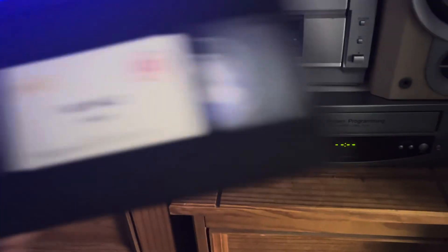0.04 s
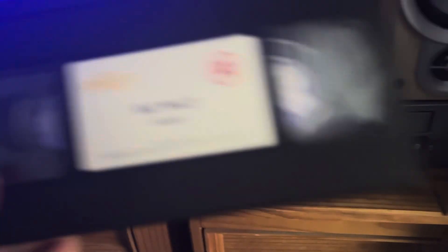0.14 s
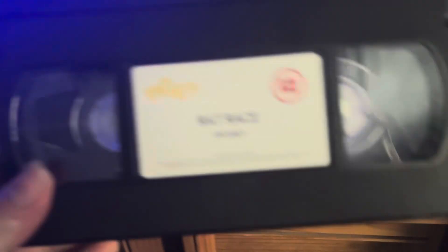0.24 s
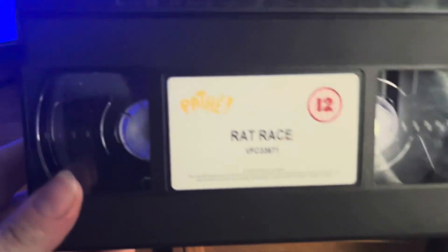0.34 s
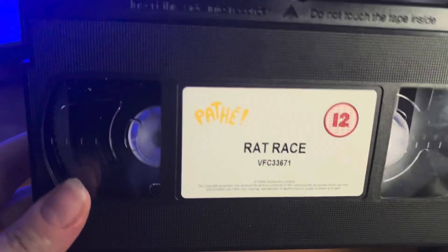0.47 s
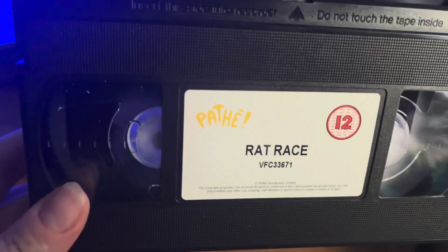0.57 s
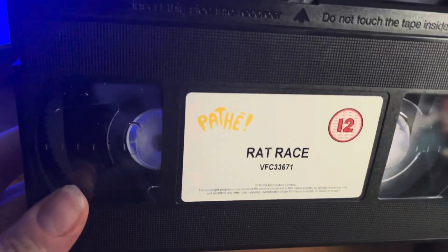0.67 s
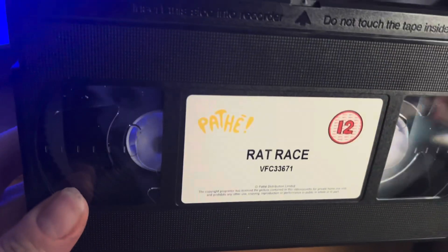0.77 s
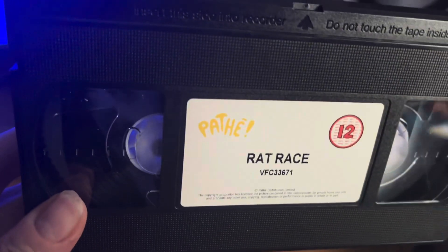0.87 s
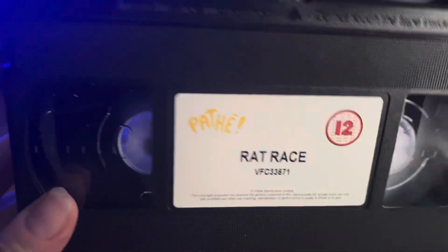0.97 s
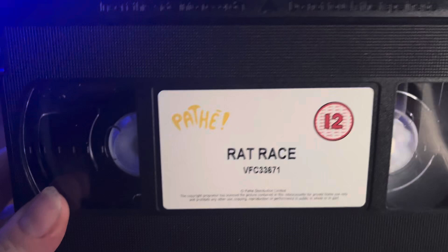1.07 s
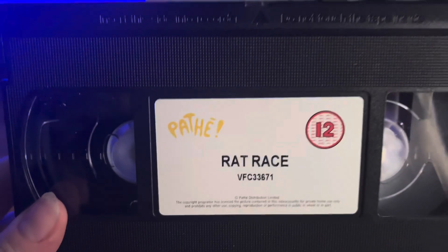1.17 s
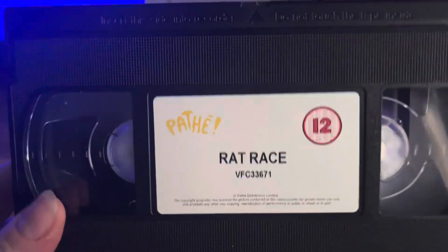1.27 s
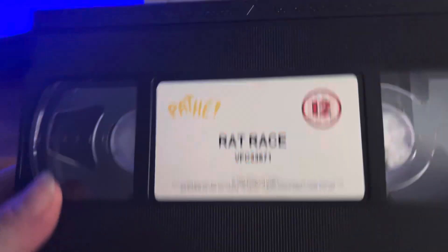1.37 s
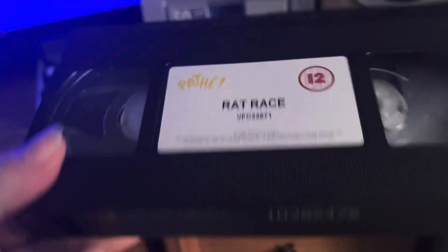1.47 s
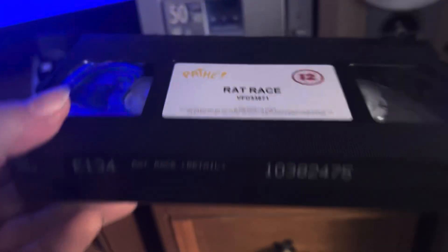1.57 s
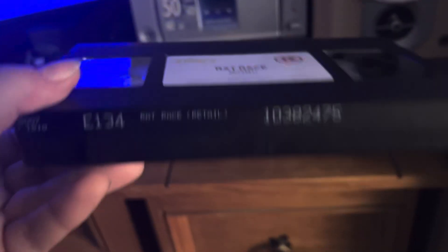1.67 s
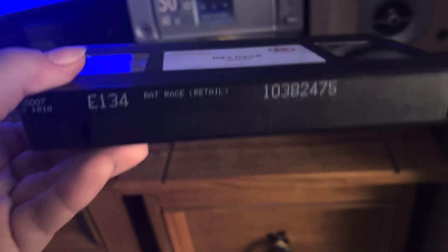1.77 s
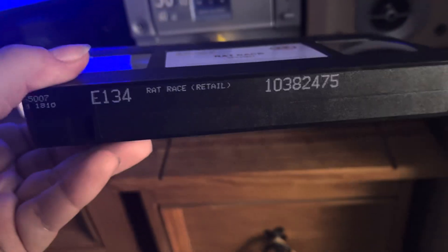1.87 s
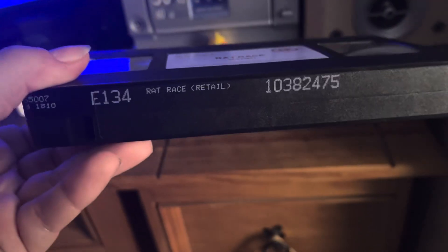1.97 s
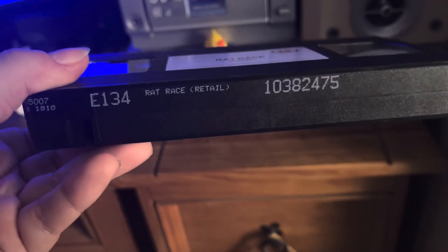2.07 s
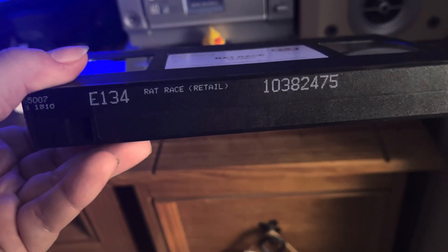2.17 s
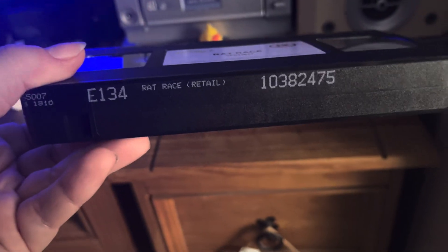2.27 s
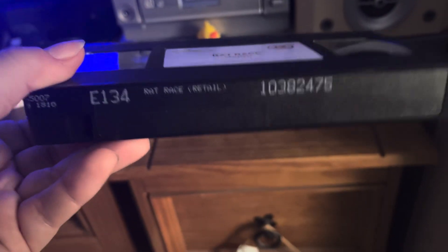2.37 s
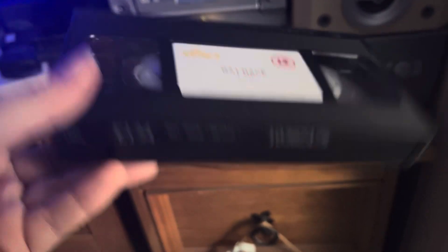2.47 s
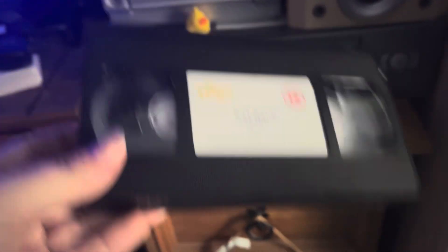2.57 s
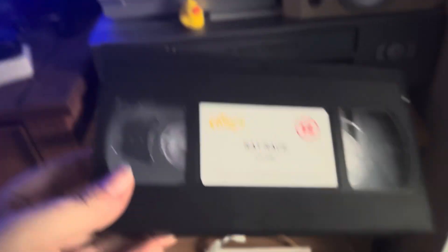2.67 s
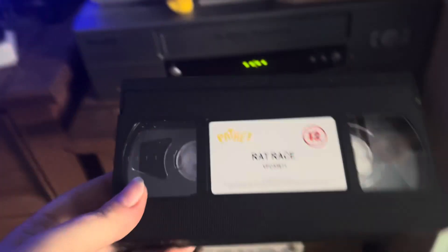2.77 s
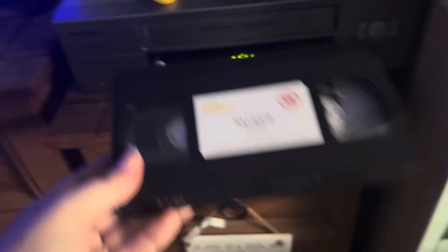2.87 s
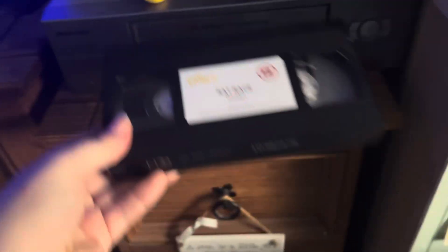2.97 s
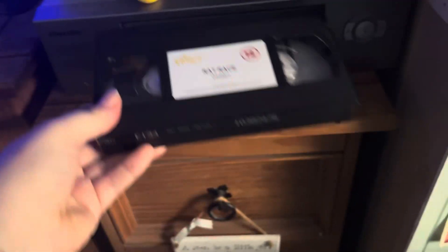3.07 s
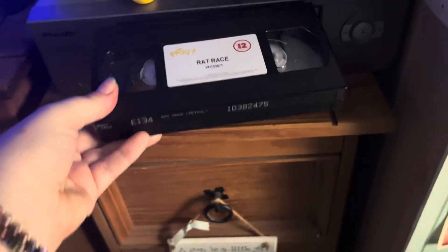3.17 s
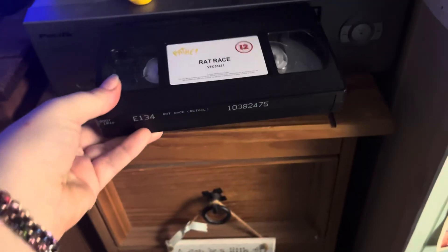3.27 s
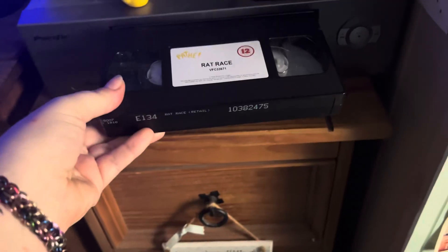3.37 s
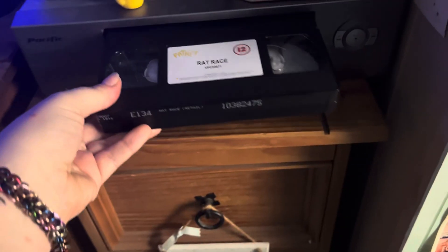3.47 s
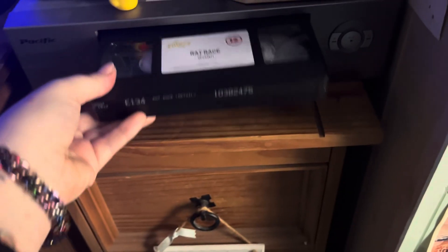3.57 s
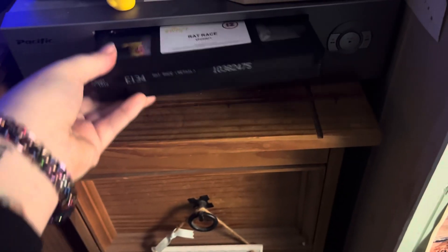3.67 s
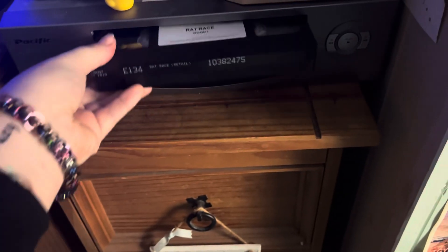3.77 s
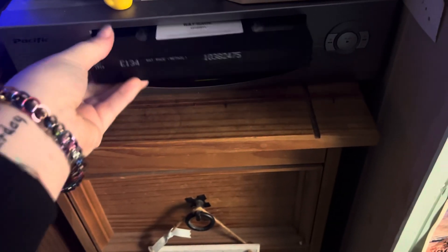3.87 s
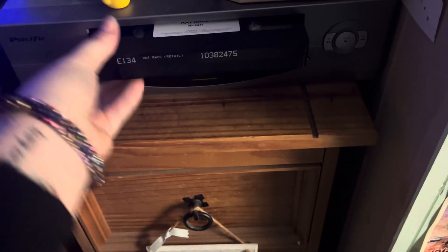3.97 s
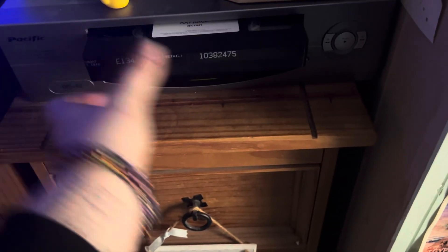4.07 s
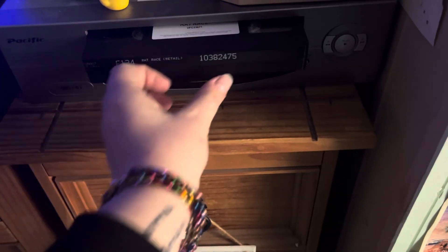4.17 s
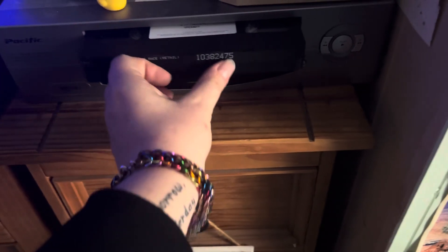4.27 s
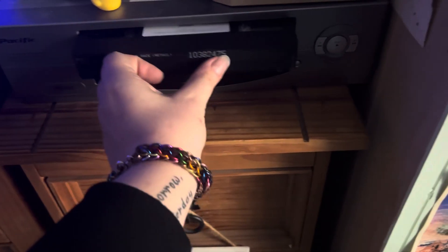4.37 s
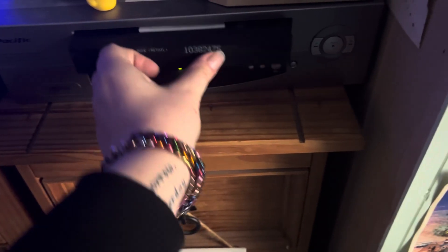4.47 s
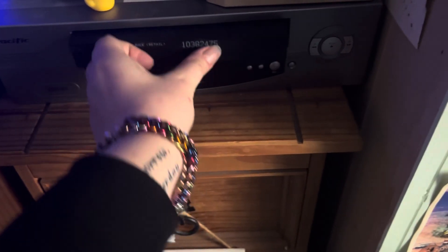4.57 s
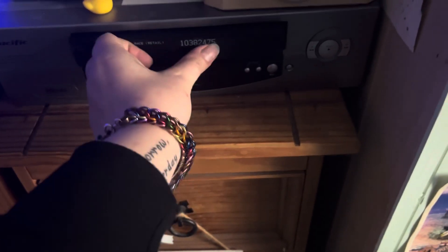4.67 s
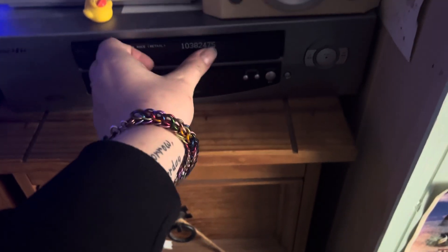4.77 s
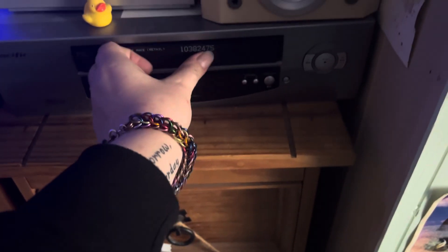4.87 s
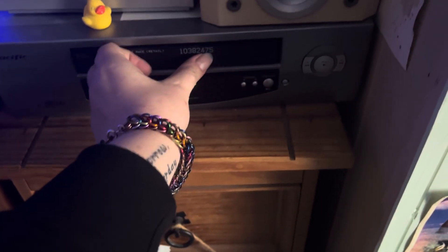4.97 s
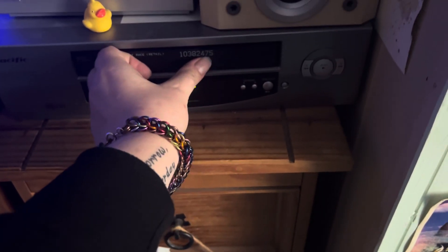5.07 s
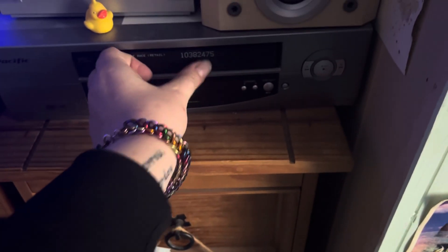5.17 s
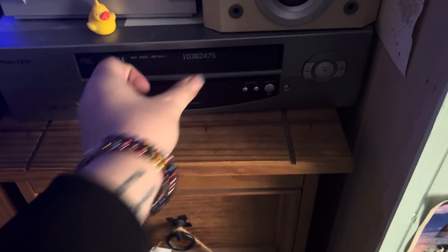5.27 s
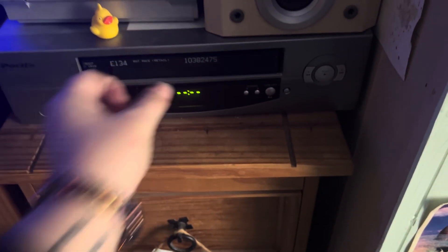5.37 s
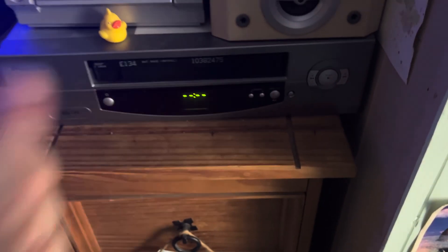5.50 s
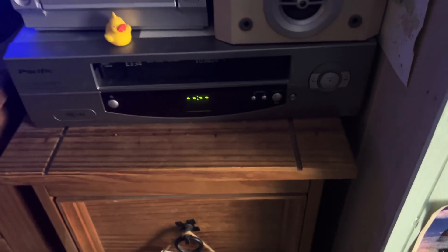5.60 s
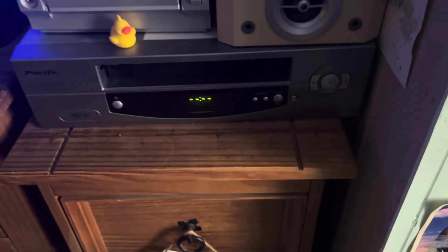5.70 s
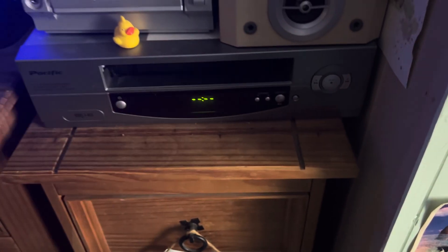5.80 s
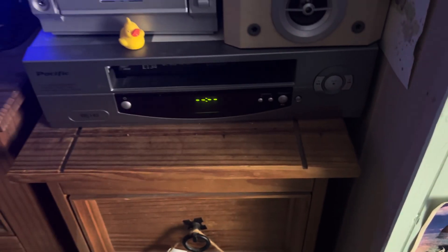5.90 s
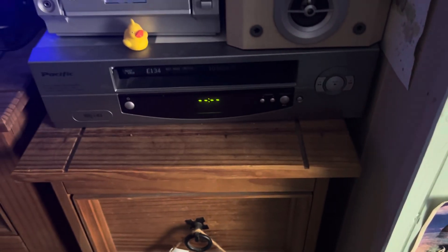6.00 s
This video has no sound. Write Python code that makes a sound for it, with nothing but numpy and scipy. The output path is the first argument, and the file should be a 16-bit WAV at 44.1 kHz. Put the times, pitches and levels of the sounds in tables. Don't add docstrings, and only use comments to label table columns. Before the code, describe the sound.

Close in a small quiet room with low rumble and faint electronic hum, a plastic cassette snaps and creaks under fingers, with soft rubs between. A sleeve rustles, then the shell scrapes and knocks sharply into a player slot, is pushed home with a click, and after a brief lull the loading tray clatters and scrapes. Close stereo phone microphone.

```python
import sys
import numpy as np
from scipy import signal
from scipy.fft import rfft, irfft, next_fast_len
from scipy.io import wavfile
from scipy.ndimage import uniform_filter1d

SR = 44100
rng = np.random.default_rng(int(sys.argv[2]) if len(sys.argv) > 2 else 0)


def ratio_of_db(decibels):
    return 10 ** (np.asarray(decibels, float) / 20)


def master_out(mix):
    frames = np.transpose(np.atleast_2d(mix))
    ceiling = np.clip(frames, -1, 1)
    pcm = np.round(ceiling * 32767).astype(np.int16)
    wavfile.write(sys.argv[1], SR, pcm)


N = 266364
SPAN = 8192
LONG = next_fast_len(N + SPAN, True)


def level(x, db):
    return x * ratio_of_db(db) / np.sqrt(np.mean(x ** 2))


def curve(table, hz, axis=1):
    rows = np.array(table, float)
    return np.interp(np.log(hz + 1), np.log(rows[:, 0] + 1), rows[:, axis])


def walk(rate):
    hold = int(SR / rate)
    steps = np.repeat(rng.standard_normal(N // hold + 1), hold)
    return 1.22 * uniform_filter1d(uniform_filter1d(steps, hold), hold)[:N]


# pitch_hz, density_db (per Hz)
ROOM = [(25, -38.5), (60, -5.5), (115, -13.5), (172, -1), (300, -13), (520, -17), (730, -24), (1000, -30.5),
        (1900, -38.5), (3500, -49), (4600, -48), (6500, -53), (15000, -54), (15300, -85.5)]
# pitch_hz, width_hz, level_db
WHINES = [
    (166.6, 12, -67),
    (3850, 270, -89),
    (11400, 500, -99),
    (15600, 35, -93.5),
]


def room():
    hz = np.arange(N // 2 + 1) * SR / N
    rumble = irfft(rfft(rng.standard_normal((2, N))) * ratio_of_db(curve(ROOM, hz)), N)
    air = level(rumble, -56) * ratio_of_db(0.64 * walk(2.18))
    for centre_hz, width_hz, db in WHINES:
        peak = 1 / (1 + ((hz - centre_hz) / (width_hz / 2)) ** 2)
        whine = irfft(rfft(rng.standard_normal((2, N))) * peak, N)
        air = air + level(whine, db) * ratio_of_db(2.2 * walk(21))
    return ports(air[0], air[1], axis=2)


# pitch_hz, left_lead_rad
LEAD = [(0, 0), (900, .4), (1500, 2.9), (1750, .2), (3000, .9), (4400, .4), (5600, -.9), (6800, -1.6),
        (7600, -3.1), (9000, -3.2), (10800, -6.25), (13000, -6.35), (14600, -9.4), (22050, -9.45)]
# pitch_hz, left_minus_right_db
TILT = [(60, 1.0), (110, 2.0), (200, 2.0), (380, 2.5), (700, 4.0), (1290, 3.0), (2380, 2.5), (4400, 2.5),
        (8120, 0.5), (15000, 0.0)]
# pitch_hz, near_likeness, room_likeness (both 0..1)
LIKENESS = [(60, .93, .92), (300, .94, .8), (800, .84, .55), (1300, .3, .4), (1550, .25, .4),
            (1900, .85, .6), (3000, .7, .5), (4800, .5, .2), (6500, .75, .35), (7700, .975, .98),
            (9000, .975, .98), (10000, .75, .6), (11000, .97, .99), (12900, .97, .99), (13700, .6, .6),
            (14700, .95, .98)]


def ports(same, other, axis):
    hz = np.arange(LONG // 2 + 1) * SR / LONG
    like = curve(LIKENESS, hz, axis=axis)
    half = np.exp(.5j * np.interp(hz, *np.transpose(LEAD))) * ratio_of_db(curve(TILT, hz) / 2)
    left = rfft(same, LONG)
    right = like * left + np.sqrt(1 - like ** 2) * rfft(other, LONG)
    return irfft([left * half, right / half], LONG)[:, :N]


def spread(x, t60, count=4):
    t = np.arange(SPAN) / SR
    share = np.array([ratio_of_db(8 * walk(14)) for _ in range(count)])
    share = share / np.sqrt(np.sum(share ** 2, axis=0))
    tails = rng.standard_normal((count, SPAN)) * np.exp(-np.log(1000) * t / t60)
    tails = tails / np.sqrt(np.sum(tails ** 2, axis=1, keepdims=True))
    return irfft(np.sum(rfft(x * share, LONG) * rfft(tails, LONG), axis=0), LONG)[:N]


def body(modes, size, scatter_db=0., detune=0.):
    hz, db, t60 = np.transpose(modes)
    chance = rng.standard_normal((2, len(hz)))
    t = np.arange(min(SPAN // 2, int(np.max(t60) * SR)))[:, None] / SR
    rings = np.sin(2 * np.pi * hz * (1 + detune * chance[0]) * t) * np.exp(-np.log(1000) * t / t60)
    sign = (-1) ** np.arange(len(hz)) if len(hz) < 20 else t60 / np.mean(t60)
    pulse = rings @ (ratio_of_db(db + scatter_db * chance[1]) / np.sqrt(t60) * sign)
    return rfft(pulse / np.sqrt(np.sum(pulse ** 2)), size)


def crowd(outline, count):
    low_hz, high_hz = outline[0][0], outline[-1][0]
    hz = low_hz + (high_hz - low_hz) * (np.arange(count) + rng.random(count)) / count
    return np.transpose([hz, curve(outline, hz), curve(outline, hz, axis=2)])


def grit(size, spread_db):
    strength_db = spread_db * np.minimum(rng.exponential(1, size), 5)
    return level(rng.standard_normal(size) * ratio_of_db(strength_db), 0)


# start_s, level_db
SLEEVE = [
    (2.4, -85),
    (2.8, -79.5),
    (2.9, -74),
    (3.24, -72.5),
]
# start_s, level_db
SLIP = [
    (3.94, -63),
    (3.96, -68.5),
    (4.11, -70.5),
    (4.2, -85),
]
# pitch_hz, level_db, t60_s
CLOTH = [(1300, 0.5, 0.0059), (2010, -1, 0.002), (2700, -2.5, 0.003), (4680, -14, 0.0032),
         (11600, -9.5, 0.0008)]
SKIN = [(2560, -5, 0.012), (3180, -8.5, .008), (5200, -0.5, 0.0053), (6385, -6, 0.0041),
        (11260, -5.5, 0.00054)]


def brush():
    t, soft = np.arange(N) / SR, 0
    for stroke, modes in ((SLEEVE, CLOTH), (SLIP, SKIN)):
        db = np.interp(t, *np.transpose(stroke), left=-120, right=-120)
        rub = rng.standard_normal(N) * ratio_of_db(db + walk(27))
        soft = soft + rfft(rub, LONG) * body(modes, LONG)
    return irfft(soft, LONG)[:N]


# pitch_hz, level_db, t60_s
CABINET = [(65, -19, 0.17), (101, -15.5, 0.21), (148, -8.5, 0.24), (226, -5.5, 0.063), (290.6, 1.5, 0.12),
           (315.1, -1, 0.1), (376.8, -8.5, 0.18), (445.7, -9.5, 0.095)]
SHELL = [(506, -5.5, 0.025), (640, -6, 0.078), (711, -3, 0.049), (850.5, -3, 0.057), (942, -1, 0.03),
         (1065, -3.5, 0.022), (1181, -6.5, 0.064), (1324, -12.5, 0.049), (1487, -12, 0.02),
         (1600, -8, 0.017)]
PLASTIC = [(1125, -8.5, 0.004), (1433, -5.5, 0.036), (1890, 7, 0.0075), (2540, 1.5, 0.019),
           (3900, -1, 0.017), (4470, -13.5, 0.018), (5930, -2, 0.0011), (7804, -12.5, 0.0038)]
TREBLE = [(6790, -16, 0.0061), (7180, 11, 0.0058), (9580, 10, 0.0047), (13200, -4.5, 0.0069),
          (15800, -5, 0.0078), (15850, -14.5, 0.0033)]
# start_s, rasp_db
ENTRY = [
    (3.24, -62.5),
    (3.32, -57),
    (3.46, -56),
    (3.54, -47.5),
    (3.621, -35.5),
    (3.75, -55.5),
    (3.79, -66),
    (3.89, -53.5),
    (3.94, -84),
]
PUSH = [
    (4.2, -77),
    (4.37, -73.5),
    (4.48, -54),
    (4.58, -53),
    (4.65, -58.5),
    (4.77, -57.5),
    (4.869, -78.5),
    (4.97, -99),
]
DRAW_IN = [
    (4.98, -84.5),
    (5.24, -85),
    (5.42, -59.5),
    (5.541, -57),
    (5.68, -66),
    (5.771, -40),
    (5.84, -38),
    (5.9, -61.5),
    (6.04, -38),
]
# cabinet_db, shell_db, treble_db
STROKE_DB = [
    (-44.5, -48, -64),
    (-47, -53, -65.5),
    (-45, -57, -64),
]
# cabinet_slope, shell_slope, treble_slope (dB per dB)
STROKE_SLOPE = [
    (0.46, 0.93, 0.76),
    (0.63, 1, 0.81),
    (0.25, 0.35, 0.67),
]


def slide():
    t = np.arange(N) / SR
    flutter, out = 2 * walk(45), np.zeros(N + SPAN)
    for stroke, levels, slopes in zip((ENTRY, PUSH, DRAW_IN), STROKE_DB, STROKE_SLOPE):
        span = slice(int(stroke[0][0] * SR), min(int(stroke[-1][0] * SR), N))
        rasp_db = np.interp(t[span], *np.transpose(stroke))
        size = len(rasp_db) + SPAN // 2
        fast = next_fast_len(size, True)
        fade = signal.windows.tukey(len(rasp_db), .1)
        for spot in range(4):
            wander = 3 * walk(14)[span]
            bodies = (crowd(PLASTIC, count=60), CABINET, SHELL, crowd(TREBLE, count=40))
            for modes, db, slope in zip(bodies, (-55, *levels), (1, *slopes)):
                force_db = db + slope * (rasp_db + 56) - 10 + flutter[span] + wander
                force = fade * grit(len(rasp_db), 3.7) * ratio_of_db(force_db)
                shaken = irfft(rfft(force, fast) * body(modes, fast, 3.3, 0.038), fast)
                out[span.start:span.start + size] += shaken[:size]
    return out[:N]


def touch(out, s, length, parts):
    t, total = np.arange(SPAN) / SR, 0
    for modes, db, rise, stretch in parts:
        push = (1 - np.exp(-t / rise)) * np.exp(-np.log(1000) * t / (stretch * length))
        force = push / push.max() * grit(SPAN, 2.27)
        force[int(rise * SR)] += 4 * np.clip(0.0027 / rise - 1, 0, 1)
        if modes is CABINET:
            force = 0.37 * force + 16 * (np.arange(SPAN) == int(rise * SR))
        total = total + ratio_of_db(db) * rfft(force) * body(modes, SPAN, 2.25, 0.025)
    at = int(s * SR)
    out[at:at + SPAN] += irfft(total, SPAN)


def near_pitch(modes, centre_hz, octaves):
    hz, _, t60 = np.transpose(modes)
    return np.transpose([hz, -6 * (np.log2(hz / centre_hz) / octaves) ** 2, t60])


def tilted_plastic(db_per_octave):
    plastic = crowd(PLASTIC, count=50)
    plastic[:, 1] += db_per_octave * np.log2(plastic[:, 0] / 2500)
    return plastic


# start_s, peak_db, pitch_hz, length_s
RUBS = [(0.878, -58, 2340, 0.17), (0.89, -60.5, 5200, 0.072), (1.281, -58, 2670, 0.09),
        (1.335, -63, 1520, 0.16), (1.751, -68, 3850, 0.22), (1.894, -66, 5600, 0.12),
        (1.875, -65.5, 1600, 0.089), (1.9023, -56.5, 2300, 0.1), (2.483, -66.5, 2190, 0.08),
        (2.588, -66.5, 2900, 0.077), (2.878, -58, 2700, 0.12), (4.204, -65, 3330, 0.095),
        (4.233, -63, 2680, 0.069), (4.832, -56.5, 3660, 0.034), (4.878, -54, 2540, 0.106),
        (4.8884, -57, 2540, 0.12), (5.07, -66.5, 2300, 0.08), (5.095, -67, 3680, 0.068),
        (5.13, -60, 3750, 0.061)]


def finger_rubs(out):
    for s, db, centre_hz, length in RUBS:
        modes = near_pitch(crowd(PLASTIC, count=50), centre_hz, 0.65)
        touch(out, s, length, [(modes, db - 6.5, 0.0096, 1)])


# start_s, peak_db, pitch_hz
TAPS = [(0.2057, -58.5, 684), (1.4497, -43.5, 640), (3.3086, -34, 770), (3.4048, -37, 734),
        (3.4867, -32.5, 730), (4.252, -52.5, 870), (4.331, -52.5, 650), (4.42, -43.5, 650),
        (5.035, -62, 900), (5.183, -47.5, 690), (5.205, -55, 690), (5.46, -48, 1020), (5.64, -67, 650)]


def panel_taps(out):
    for s, db, panel_hz in TAPS:
        touch(out, s, 0.062, [(near_pitch(SHELL, panel_hz, 0.44), db - 1.5, .002, 1)])


# start_s, click_db, ring_db and treble_db (both relative to the click), length_s
IN_HAND = [
    (0.2057, -47, -8, -54, 0.03),
    (0.41, -43.5, -2, -16, 0.063),
    (0.4244, -44.5, -1, -32, .041),
    (1.277, -60.5, -10, -5, 0.033),
    (1.4497, -34.5, -4.5, -31.5, 0.061),
    (1.468, -40, -16, -34.5, 0.076),
    (1.542, -45.5, -32, -27.5, .015),
    (1.595, -55.5, -29, -27, 0.12),
]
# pitch_hz, level_db, t60_s
HELD = [(650, -16, 0.054), (759, 1.5, 0.051), (843, -5.5, 0.035)]


def hand_snaps(out):
    rise = 0.00045
    for s, click_db, ring_db, hard_db, length in IN_HAND:
        touch(out, s, length, (
            (tilted_plastic(0.63 * (hard_db + 33.5)), click_db - 7.5, rise, 1),
            (HELD, click_db + ring_db - 3.5, .004, .8),
            (crowd(TREBLE, count=30), click_db + hard_db + 10.5, rise / 2, .4)))


# start_s, click_db, weight_db (cabinet relative to click), hardness_db (treble relative to click)
IN_SLOT = [(3.262, -31, -40, -22), (3.3091, -35.5, -4, -27), (3.3429, -18, -11, -13.5),
           (3.362, -35.5, -9, -21), (3.4048, -43, 6, -48), (3.485, -38, 3, -37), (3.5609, -25.5, -20, -58),
           (3.59, -27, -24, -42), (3.637, -25.5, -2, -12), (3.664, -25, 4.5, -5),
           (3.6907, -34.5, 4.5, -12.5), (3.79, -44.5, 13, -17.5), (3.8096, -40.5, -28, -40),
           (3.8436, -47, -15, -21), (3.8702, -23.5, 2.5, -12.5), (3.883, -32, 11.5, 0),
           (3.893, -41.5, 14.5, -19), (3.9088, -40.5, -16, -15.5)]
PUSHED = [(4.2486, -55, 6.5, -18), (4.329, -51, 9, -36), (4.42, -47.5, 12.5, -21.5), (4.5012, -37, 11, -21),
          (4.5286, -43, -13, -25), (4.576, -54, 9.5, -24), (4.596, -31, -30, -21.5),
          (4.6602, -30.5, 5, -26), (4.6693, -19, -7, -10.5), (4.6749, -20.5, -16, -2.5),
          (4.6944, -39, 16.5, -19), (5.035, -67, 8, -18), (5.1827, -66.5, 25, -36),
          (5.2033, -69.5, 33.5, -31.5)]
TRAY = [(5.3679, -40, -21, -21), (5.3748, -30, -3, -0.5), (5.4296, -43.5, 7.5, -30),
        (5.46, -54, -13, -28.5), (5.503, -33.5, -0.5, -29.5), (5.5122, -46, 17, -21),
        (5.5695, -39.5, 1.5, -16), (5.5923, -32.5, 6, -28), (5.6098, -47.5, 6, -24),
        (5.6389, -33.5, 1.5, -45), (5.6634, -53.5, 19.5, -22), (5.7284, -35.5, -20, -33),
        (5.7404, -28, -6.5, -13.5), (5.7532, -38.5, 3, -19), (5.7766, -22.5, -0.5, -16),
        (5.793, -27, 0, -15), (5.8115, -33.5, -16, -10.5), (5.8322, -30.5, 1, -8), (5.855, -48, 16, -1),
        (5.9291, -37, -3, -11), (5.9463, -32.5, 3.5, -8.5), (5.9601, -22, -0.5, -16.5),
        (5.973, -24.5, 8.5, -13.5), (5.9887, -36, -5, -9)]
# length_s, middling_shell_db
KNOCK_RULES = [
    (0.0392, -35.5),
    (.052, -36.5),
    (.05, -36.5),
]


def knocks(out):
    for group, (length, middling_db) in zip((IN_SLOT, PUSHED, TRAY), KNOCK_RULES):
        for s, click_db, weight_db, hard_db in group:
            shell_db = middling_db + 0.82 * (click_db + 31.5)
            shell_db += 0.064 * weight_db - 0.11 * (hard_db + 20.5)
            touch(out, s, length, (
                (tilted_plastic(0.41 * (hard_db + 23.5)), click_db - 8, 0.02665 * length, 1.3),
                (CABINET, click_db + weight_db - 4.5, .003, 1.2),
                (SHELL, shell_db - 3.5, .003, 1.1),
                (crowd(TREBLE, count=30), click_db + hard_db, 0.016 * length, .7)))


def contacts():
    out = np.zeros(N + SPAN)
    for source in (finger_rubs, panel_taps, hand_snaps, knocks):
        source(out)
    return out[:N]


def scene():
    near = contacts() + slide() + brush()
    dull = signal.lfilter(*signal.butter(1, 3540, fs=SR), near)
    walls = [ratio_of_db(-6.5) * spread(dull, 0.18, count=2) for _ in range(2)]
    return ports(near + walls[0], spread(near, 0.055) + walls[1], axis=1) + room()


def top_cut(x):
    return signal.sosfilt(signal.butter(12, 15750, fs=SR, output="sos"), x)


def record(dry):
    low_pass = signal.ellip(8, .2, 60, 15800, fs=SR, output="sos")
    return top_cut(signal.sosfilt(low_pass, dry))


dry = scene()
out = record(dry)
master_out(out)
```